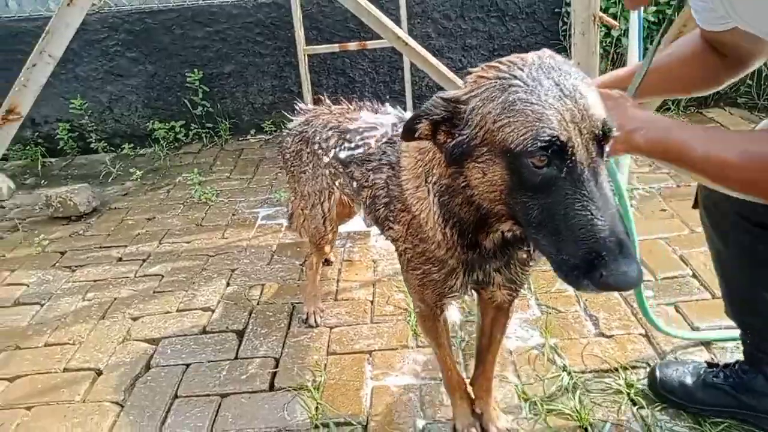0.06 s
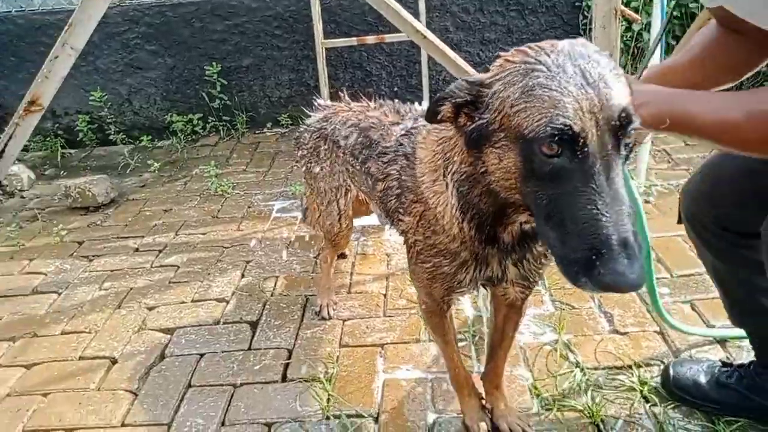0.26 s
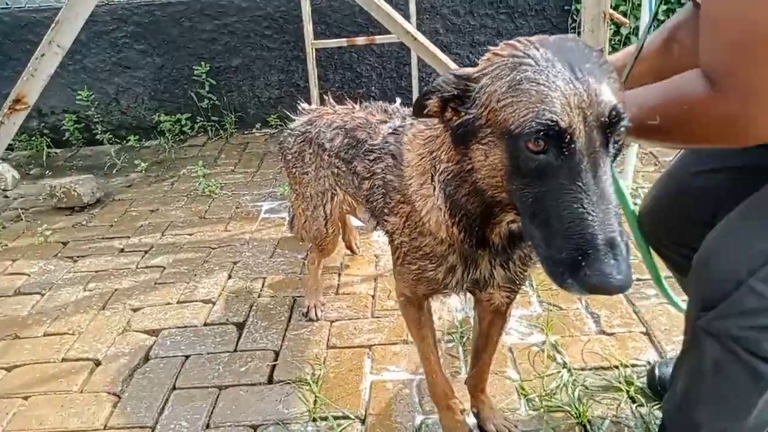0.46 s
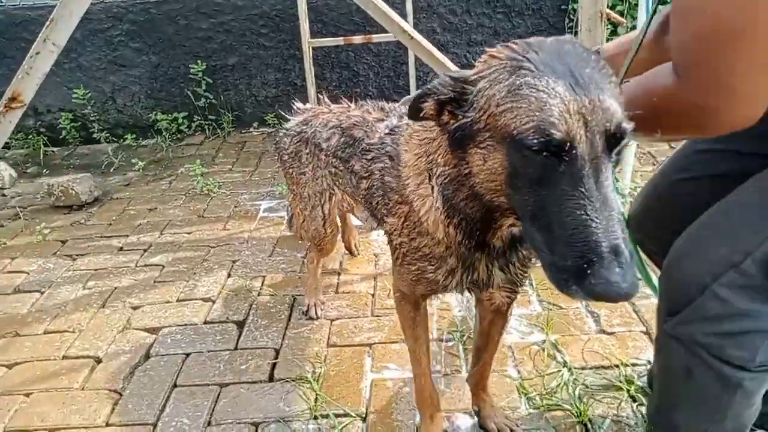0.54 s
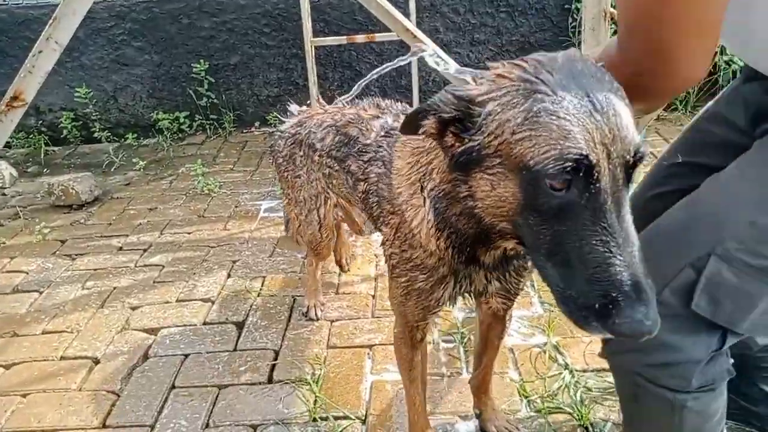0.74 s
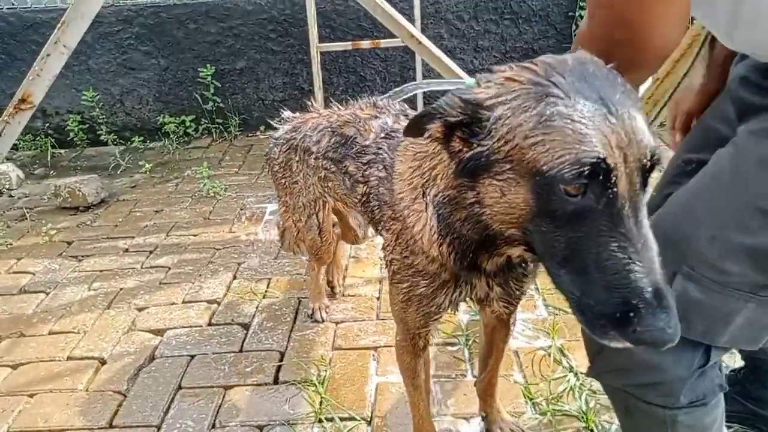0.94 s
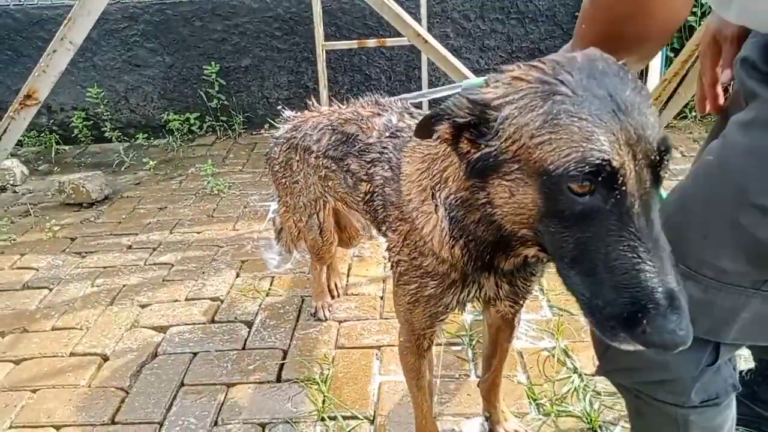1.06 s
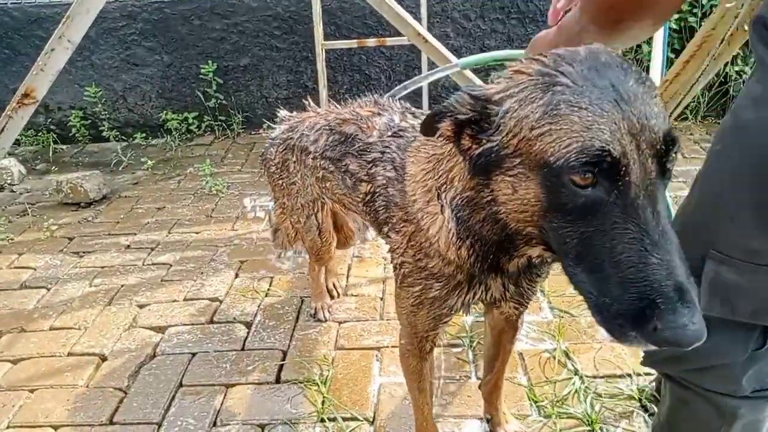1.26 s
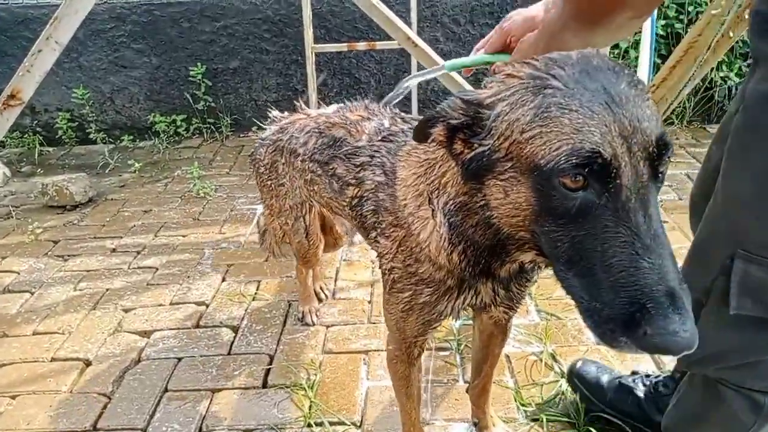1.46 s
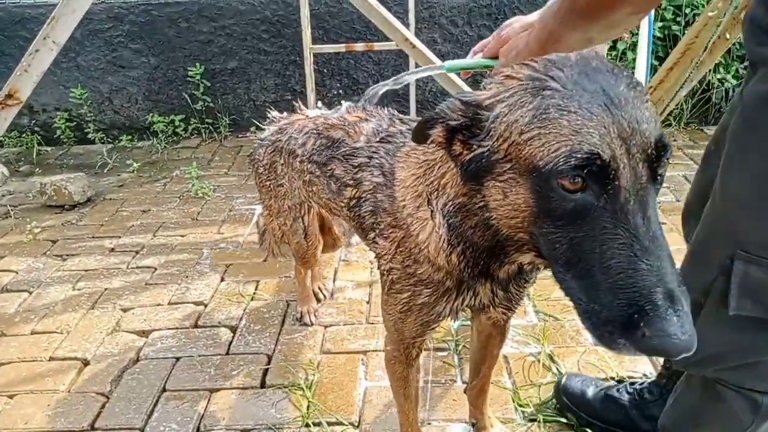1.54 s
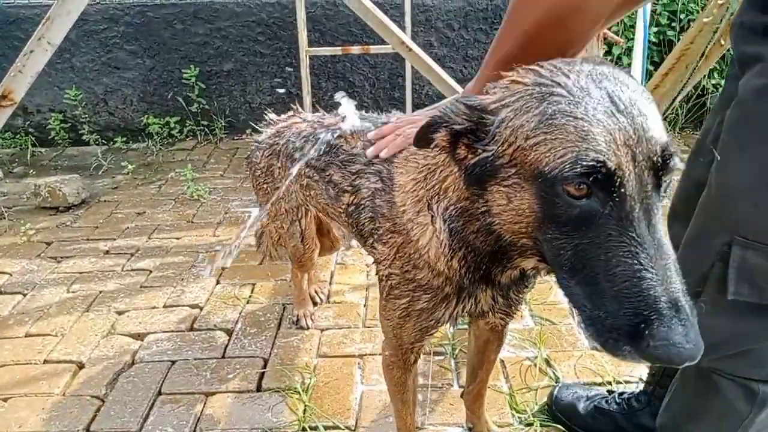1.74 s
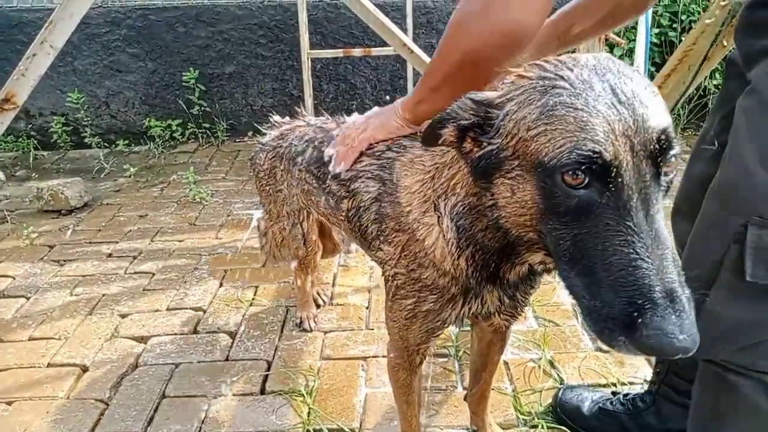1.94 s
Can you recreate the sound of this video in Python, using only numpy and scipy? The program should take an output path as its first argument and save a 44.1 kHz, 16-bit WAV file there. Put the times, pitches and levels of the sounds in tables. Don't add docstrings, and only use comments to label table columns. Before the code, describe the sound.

Hose water spatters and splashes over a wet dog and paving, with two hollow bangs nearby

```python
import sys
import numpy as np
from scipy import signal
from scipy.fft import rfft, irfft, next_fast_len
from scipy.io import wavfile
from scipy.ndimage import map_coordinates

SR = 44100
rng = np.random.default_rng(int(sys.argv[2]) if len(sys.argv) > 2 else 0)


def store_pcm(level_fs):
    pcm = np.round(np.clip(level_fs, -1, 1) * 32767).astype(np.int16)
    wavfile.write(sys.argv[1], SR, np.atleast_2d(pcm).T)


def voltage_ratio(level):
    return 10 ** (np.asarray(level, float) / 20)


N = 88200

# time in seconds, level in dB.
TRAFFIC_LEVEL = [(0, -51.5), (.45, -49), (.62, -43.5), (.9, -53.5), (1.1, -49), (2, -51)]
# frequency in Hz, level in dB per Hz.
TRAFFIC_COLOUR = [(15, -62), (25, -43), (81, -0.5), (569, -17), (650, -20.5), (1380, -19), (5000, -24),
                  (6500, -48), (11000, -120)]
# time in seconds, pitch in Hz, level in dB.
MOTOR_HUM = [(0, 77.5, -47), (.4, 80.45, -48.5), (.5, 92.4, -50), (.62, 124.7, -50), (.76, 127.8, -42.5),
             (1.33, 130.3, -45), (1.55, 130.5, -50)]

# start in seconds, level in dB, tilt in dB per octave.
CLINKS = [
    (1.545, -37, 3.5),
    (1.575, -41, -1),
    (1.655, -42.5, 0.5),
]
# frequency in Hz, width in Hz, level in dB, 60 dB decay in seconds.
TUBE_MODES = [(453, 90, 1.5, 1.56), (780, 31, -5.5, 0.87), (946, 46, -7, 1.2), (1427, 69, -4.5, 1.45),
              (2054, 110, 2.5, 0.74), (2645, 24, 3, 0.46), (2458, 55, -6, 0.78)]
# start in seconds, level in dB, treble in dB, tilt in dB per octave,
# frequency the treble starts from in Hz.
BANGS = [
    (-0.15, -38, -2, -8.5, 4700),
    (0.231, -16, -6.5, -0.5, 4030),
    (0.505, -11, 2, 0.5, 4770),
]
STRUCK_NEAR_RIM = [0, 0, 1]
# frequency in Hz, width in Hz, level in dB, 60 dB decay in seconds,
# level change in dB when struck near the rim.
PANEL_MODES = [(592, 61, -4.5, 0.85, -3.5), (897, 47, -7, 1.26, -9.5), (1074, 107, -9, 1.75, -6),
               (1140, 62, -0.5, 0.62, -4), (1462, 142, 2, 0.66, -0.5), (1984, 160, -0.5, 0.78, 0.5),
               (779, 56, -22.5, 1.1, 9), (2286, 200, -8.5, 1.12, 0.5), (2566, 100, -8.5, 0.72, 3.5),
               (2750, 250, -7.5, 0.77, 1), (3090, 240, -16, 0.77, 9), (3690, 160, -5, 0.42, 4.5),
               (5630, 85, -20, 0.28, 9), (6840, 330, -28.5, 0.4, 7.5)]
# frequency in Hz, level in dB per Hz.
ECHO_COLOUR = [(60, -27), (130, -8), (300, -7), (700, -3), (2000, 0), (3800, -5), (4600, -10), (7000, -24),
               (12000, -38)]
# frequency in Hz, 60 dB decay in seconds.
SHED_DECAY = [(150, 1.27), (500, 1.146), (1400, 0.76), (3700, 0.45), (8000, 0.42)]

# start in seconds, level in dB, pitch in Hz, 60 dB decay in seconds.
AIR_POCKETS = [(.378, -47, 4500, 0.16), (1.03, -39.5, 1094, 0.45), (1.085, -36.5, 1480, 0.27),
               (1.095, -33.5, 2470, 0.32), (1.115, -35.5, 1754, 0.24), (1.12, -38, 3530, 0.18),
               (1.16, -27, 2130, 0.13), (1.162, -33.5, 1560, 0.23), (1.285, -39, 2880, 0.38),
               (1.503, -34.5, 3830, .12), (0.904, -42, 5600, .12)]
# start in seconds, level in dB, centre in Hz, rise in seconds,
# 60 dB decay in seconds.
SPLATS = [(0.0, -35.5, 2950, 0.0015, 0.33), (0.031, -38.5, 910, 0.0063, 0.13),
          (0.789, -32.5, 1270, 0.0022, 0.19), (0.903, -36, 4160, 0.0006, 0.2),
          (1.059, -34.5, 3280, 0.0035, 0.21), (1.085, -27, 2500, 0.0024, 0.16),
          (1.122, -31.5, 2680, 0.011, 0.43), (1.156, -30.5, 1580, 0.0013, 0.17),
          (1.155, -26, 3400, .001, 0.11), (1.215, -34.5, 3573, 0.0011, 0.08),
          (1.259, -23.5, 2430, 0.003, 0.26), (1.376, -36.5, 920, 0.0005, 0.058),
          (1.389, -35.5, 3487, 0.0064, 0.22), (1.45, -41.5, 3030, 0.0074, 0.27),
          (1.501, -34.5, 3630, 0.0015, 0.1), (1.655, -38, 2060, 0.00098, 0.13),
          (1.827, -42, 1400, 0.0026, 0.054), (1.936, -41.5, 1330, 0.0014, 0.13),
          (1.968, -26.5, 2780, 0.0011, 0.077)]
# start in seconds, peak in dB, pitch in Hz.
TICKS = [(0.1082, -27.5, 8800), (0.174, -44, 9000), (0.2827, -35, 9000), (0.3584, -32, 9560),
         (0.411, -38, 8790), (0.4199, -31, 14100), (0.4519, -35, 9650), (0.4648, -31, 9200),
         (0.6574, -36, 8600), (0.683, -36, 14900), (0.7008, -41, 10300), (0.7312, -43, 8710),
         (0.7974, -37, 8600), (0.7996, -34, 12940), (0.8074, -52, 13400), (0.827, -42, 8680),
         (0.8445, -38, 8500), (0.886, -32, 8600), (0.8884, -39, 13000), (0.9053, -33, 9260),
         (0.9634, -50, 8410), (0.9834, -32, 12200), (1.0044, -31, 12200), (1.0261, -35, 13800),
         (1.0415, -34, 8650), (1.155, -16, 12600), (1.2146, -25, 14500), (1.2955, -30, 14800),
         (1.3624, -35, 8810), (1.403, -23, 10500), (1.4159, -28, 9750), (1.4224, -27, 10700),
         (1.4364, -27, 13500), (1.4491, -25, 12700), (1.4654, -33, 14500), (1.475, -29, 9700),
         (1.5077, -32, 10300), (1.5154, -40, 8550), (1.5764, -38, 10200), (1.5834, -37, 8500),
         (1.7045, -32.5, 9600)]
# start in seconds, peak in dB, pitch in Hz.
PLOPS = [
    (1.378, -31, 2520),
    (1.3805, -29.5, 2650),
    (1.4, -37, 2530),
    (1.4065, -47, 3050),
    (1.5025, -42, 3920),
    (1.9395, -40, 1460),
    (1.0904, -29, 2560),
    (1.968, -25, 2750),
    (1.9715, -45, 2750),
]
# start in seconds, peak in dB, pitch in Hz, spatter in dB.
DROPS = [(0.0343, -30.5, 8400, -62), (0.1092, -37.5, 7900, -2), (0.1174, -26.5, 7500, -8),
         (0.175, -23.5, 9000, -38), (0.2084, -36.5, 8300, -2.5), (0.2898, -18, 7050, -6.5),
         (0.294, -26, 7000, -40), (0.4946, -32.5, 8300, -2), (0.8295, -32, 7500, -16),
         (0.8734, -43, 7250, -6), (0.8864, -36.5, 7850, 2.5), (0.983, -35.5, 7790, -9),
         (1.262, -30, 8100, -7), (1.281, -30.5, 7500, -7), (1.3827, -48, 7600, -1),
         (1.4019, -36, 7740, -12), (1.4502, -36.5, 7600, 1), (1.5568, -22.5, 7660, -27),
         (1.5842, -23, 7740, -20), (1.5949, -16.5, 8220, -22), (1.726, -26.5, 7760, -12.5),
         (1.816, -33, 7160, -5), (1.8432, -31.5, 6900, -7), (1.9631, -24, 7050, -30)]
# frequency in Hz, level in dB per Hz.
SPATTER_COLOUR = [(3000, 2), (6000, 0.5), (8000, 6.5), (10500, -1.5), (15500, 0)]
# time in seconds, level in dB.
SPRAY_FLOW = [(0.0, -48), (1.59, -57), (2.0, -53)]
# start in seconds, level in dB, share of fine mist from 0 to 1,
# rise in seconds, 60 dB decay in seconds.
SURGES = [(0.17, -42, 0.92, 0.0021, 0.13), (0.286, -43.5, 0.4, .0027, 0.19),
          (0.903, -65, 0.6, 0.0018, 0.56), (1.051, -29.5, 0.73, 0.0079, 0.2),
          (1.12, -42, 0.16, 0.0061, 0.39), (1.155, -26, 0.71, .0027, 0.14), (1.214, -46, .95, 0.0024, 0.13),
          (1.293, -48, 0.8, .0027, 0.42), (1.38, -46, 0.19, 0.0014, 1), (1.395, -48, 1, 0.0035, 0.43),
          (1.445, -46, 1, .005, 0.21), (1.505, -63, 0.48, 0.0049, 0.15), (1.936, -42.5, 0.63, 0.0024, 0.43),
          (1.961, -36, 0.3, 0.0021, 0.16)]
# frequency in Hz, level in dB per Hz.
FIZZ_COLOUR = [(800, -24), (2000, 12), (4000, -5), (7000, 13.5), (10000, 4), (14000, 6), (16000, 0)]


def unit(x):
    return x / np.sqrt(np.mean(x ** 2) + 1e-20)


def along(points, hz):
    f, v = np.transpose(points)
    return np.interp(np.log(hz + 1), np.log(f + 1), v)


def curves(rows):
    s, *columns = np.transpose(rows)
    return [np.interp(np.arange(N) / SR, s, column) for column in columns]


def seconds(size):
    return np.arange(size) / SR


def wobble(rate, size=N):
    knots = rng.standard_normal(int(size * rate / SR) + 4)
    return map_coordinates(knots, [np.arange(size) * rate / SR])


def filtered(x, response):
    size = next_fast_len(x.shape[-1] + 8192)
    spectrum = rfft(x, size) * response(np.fft.rfftfreq(size, 1 / SR))
    return irfft(spectrum, size)[..., :x.shape[-1]]


def noise(colour, size=N):
    return unit(filtered(rng.standard_normal(size), lambda hz: voltage_ratio(along(colour, hz))))


def narrow_noise(centre_hz, width_hz, size):
    def resonance(hz):
        return 1j * hz * width_hz / (centre_hz ** 2 - hz ** 2 + 1j * hz * width_hz)
    return unit(filtered(rng.standard_normal(size), lambda hz: resonance(hz) ** 2))


def ringing(modes, t):
    blur_hz = 35
    total = 0
    for hz, width_hz, db, t60 in modes:
        total = total + voltage_ratio(db - 60 * t / t60) * narrow_noise(hz, max(width_hz, blur_hz), len(t))
    return total / np.sqrt(len(modes))


def burst(t, rise, t60):
    return (1 - np.exp(-t / rise)) ** 2 * voltage_ratio(-60 * t / t60)


def damped_sine(t, hz, cycles):
    return np.sin(2 * np.pi * hz * t) * np.exp(-t * hz / cycles)


def add(track, s, sound):
    at = round(s * SR)
    part = track[max(at, 0):][:len(sound) + min(at, 0)]
    part += sound[max(-at, 0):][:len(part)]


def grains(count, centre_hz, spread, cycles, spread_db):
    chance = rng.random((count, 2))
    hz = np.clip(centre_hz * np.exp(spread * rng.standard_normal(count)), 500, 15500)[:, None]
    size = np.minimum(-np.log(chance[:, 1:]), 3)
    wave = voltage_ratio(spread_db * size) * damped_sine(seconds(200), hz, cycles)
    at = (chance[:, :1] * N).astype(int) + np.arange(200)
    return unit(np.bincount(at.ravel(), wave.ravel(), minlength=N)[:N])


def street():
    road_db, = curves(TRAFFIC_LEVEL)
    road = voltage_ratio(road_db + 6 + 0.61 * wobble(10.8)) * noise(TRAFFIC_COLOUR)
    hz, hum_db = curves(MOTOR_HUM)
    running = np.clip((MOTOR_HUM[-1][0] - seconds(N)) / 0.05, 0, 1)
    hum_level = np.sqrt(2) * running * voltage_ratio(hum_db + 1.5 * wobble(16.8))
    return road + hum_level * np.sin(2 * np.pi * np.cumsum(hz) / SR)


def clinks():
    out, t = np.zeros(N), seconds(SR // 2)
    for s, db, tilt_db, in CLINKS:
        modes = [(hz, width, level + tilt_db * np.log2(hz / 1500), t60) for hz, width, level, t60 in TUBE_MODES]
        wash = voltage_ratio(-5.5 - 60 * t / 1.1) * noise(ECHO_COLOUR, size=len(t))
        add(out, s, voltage_ratio(db) * (1 - np.exp(-t / 0.003)) * (ringing(modes, t) + wash))
    return out


def bangs():
    out, t = np.zeros(N), seconds(SR * 5 // 4)
    rise_s, far_wall_s, far_wall_db = 0.0067, 0.072, -8.5
    late_t = np.clip(t - far_wall_s, 0, None)
    swell = (1 - np.exp(-t / rise_s)) ** 2
    swell = swell + voltage_ratio(far_wall_db) * (1 - np.exp(-late_t / rise_s)) ** 2

    spacing_hz, roughness_db = 30, 3.5
    knots = rng.standard_normal(SR // spacing_hz)

    def small_modes(hz):
        return voltage_ratio(roughness_db * hz / (hz + 1500) * map_coordinates(knots, [hz / spacing_hz]))

    for (s, db, treble_db, tilt_db, treble_hz), rim in zip(BANGS, STRUCK_NEAR_RIM):
        def blow_colour(hz):
            treble = treble_db / (1 + (treble_hz / (hz + 1)) ** 20)
            return voltage_ratio(tilt_db * np.log2((hz + 200) / 1500) + treble)

        modes = [(hz, width, level + rim * change, t60) for hz, width, level, t60, change in PANEL_MODES]
        echoes = unit(filtered(noise(ECHO_COLOUR, size=len(t)), small_modes))
        hz, at, bands = signal.stft(echoes, SR, nperseg=256)
        bands = bands * voltage_ratio(-60 * at[:, None] / along(SHED_DECAY, hz)).T
        bed = voltage_ratio(1.5) * signal.istft(bands, SR, nperseg=256)[1][:len(t)]
        panel = filtered(bed + voltage_ratio(8) * ringing(modes, t), blow_colour)
        add(out, s, voltage_ratio(db - 6.5 + 0.65 * wobble(32.0, size=len(t))) * swell * panel)
    return out


def pockets():
    out, t = np.zeros(N), seconds(SR // 3)
    q, rise_s = 10, 0.003
    for s, db, hz, t60 in AIR_POCKETS:
        tone = ringing([(hz, hz / q, 0, t60)], t)
        add(out, s, voltage_ratio(db) * (1 - np.exp(-t / rise_s)) * tone)
    return out


def splats():
    out, t = np.zeros(N), seconds(SR // 2)
    q, climb, climb_s, grain_db = 1.94, 1.32, 0.093, -1
    late = 1 - np.exp(-t / climb_s)
    for s, db, hz, rise, t60 in SPLATS:
        low = narrow_noise(hz, hz / q, len(t))
        high = narrow_noise(climb * hz, climb * hz / q, len(t))
        body = np.sqrt(1 - late) * low + np.sqrt(late) * high
        grain = voltage_ratio(db + grain_db * wobble(180, size=len(t)))
        add(out, s, grain * burst(t, rise, t60) * body)
    return out


def ticks():
    out, t = np.zeros(N), seconds(SR // 100)
    for rows, gain_db in ((TICKS, 1), (PLOPS, 3)):
        for s, db, hz in rows:
            add(out, s, voltage_ratio(db + gain_db) * damped_sine(t, hz, cycles=3.8))
    return out


def drops():
    out, t = np.zeros(N), seconds(SR // 8)
    bounce_s, bounce_db, bounce_pitch = 0.0033, -8, 0.88

    def tick(hz):
        return damped_sine(t, hz, cycles=4.5) * (1 - np.exp(-t * hz))

    for s, db, hz, spatter_db in DROPS:
        grain = voltage_ratio(spatter_db + 3 * wobble(550, size=len(t)))
        spatter = grain * burst(t, rise=0.0015, t60=0.06) * noise(SPATTER_COLOUR, size=len(t))
        add(out, s, voltage_ratio(db) * (tick(hz) + spatter))
        add(out, s + bounce_s, voltage_ratio(db + bounce_db) * tick(bounce_pitch * hz))
    return out


def spray():
    t = seconds(SR // 2)
    steady = voltage_ratio(curves(SPRAY_FLOW)[0])
    coarse_flow, mist_flow = steady.copy(), steady.copy()
    for s, db, mist_share, rise, t60 in SURGES:
        surge = 2 * voltage_ratio(db) * burst(t, rise, t60)
        add(coarse_flow, s, (1 - mist_share) * surge)
        add(mist_flow, s, mist_share * surge)
    fizz = voltage_ratio(-4 + 0.4 * wobble(37.6) + 1.8 * wobble(270)) * noise(FIZZ_COLOUR)
    crackle = voltage_ratio(-2) * grains(count=4000, centre_hz=8900, spread=0.7, cycles=0.81, spread_db=4.5)
    water = fizz + crackle
    mist = filtered(water, lambda hz: 1 / (1 + (10200 / (hz + 1)) ** 6))
    trickle = voltage_ratio(-64) * grains(count=140, centre_hz=11000, spread=0.41, cycles=1.8, spread_db=2.5)
    return coarse_flow * (water - mist) + mist_flow * mist + trickle


def scene():
    background = street() + clinks() + bangs()
    splashes = pockets() + splats() + ticks() + drops()
    return (background + splashes + spray())[None]


def low_pass(x):
    return signal.sosfilt(signal.butter(12, 16180, fs=SR, output="sos"), x)


def record(dry):
    def bell(hz, centre_hz, width_hz):
        return np.exp(-((hz - centre_hz) / width_hz) ** 2)

    def microphone(hz):
        notch_db = -11 * bell(hz, 5014, 830)
        port_db = 3.5 * bell(hz, 7600, 640)
        return voltage_ratio(notch_db + port_db) / (1 + (hz / 15500) ** 200)

    mix = np.tanh(filtered(dry, microphone) / 0.91) * 0.89
    return low_pass(mix)


dry = scene()
out = record(dry)
store_pcm(out)
```